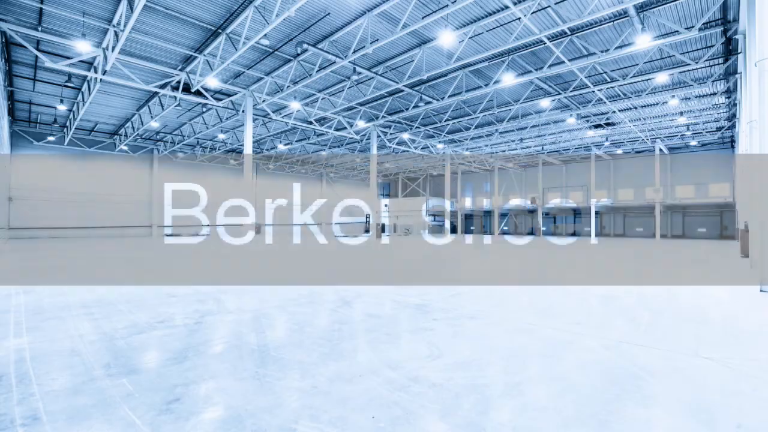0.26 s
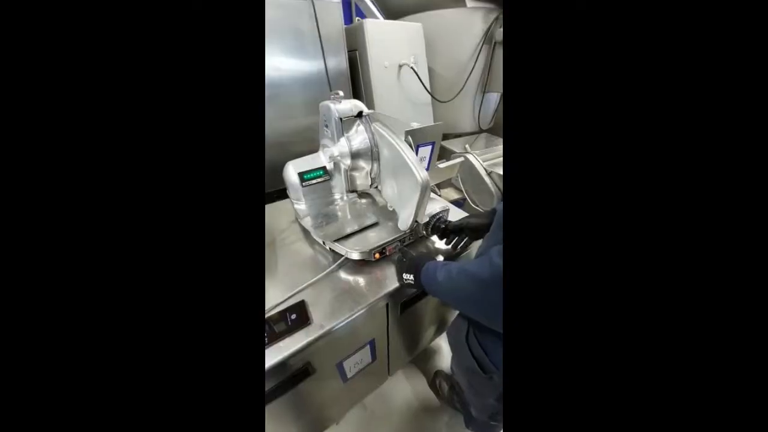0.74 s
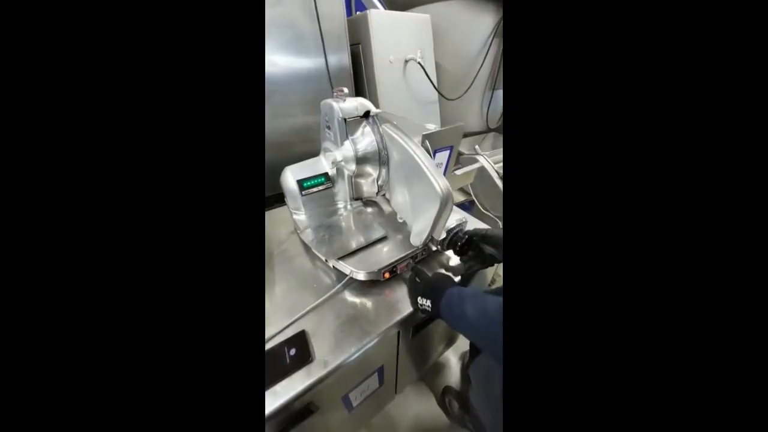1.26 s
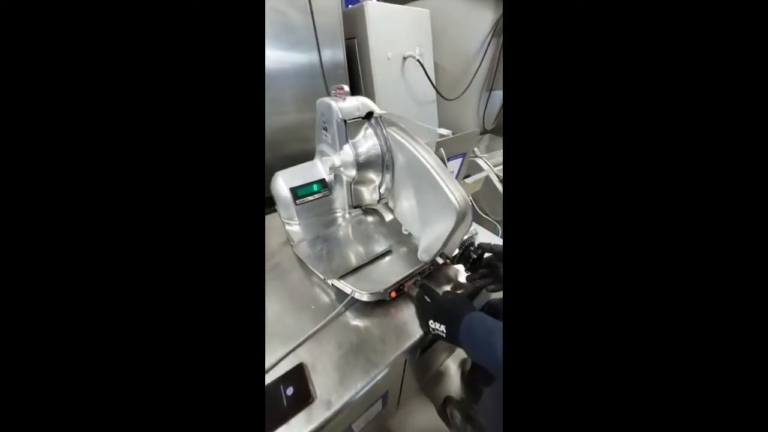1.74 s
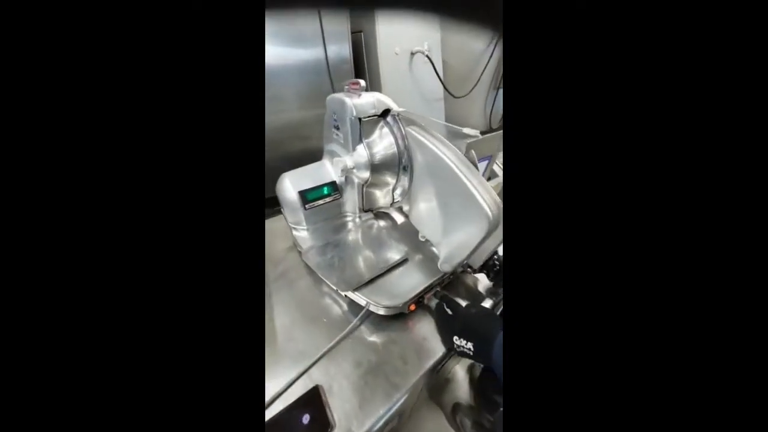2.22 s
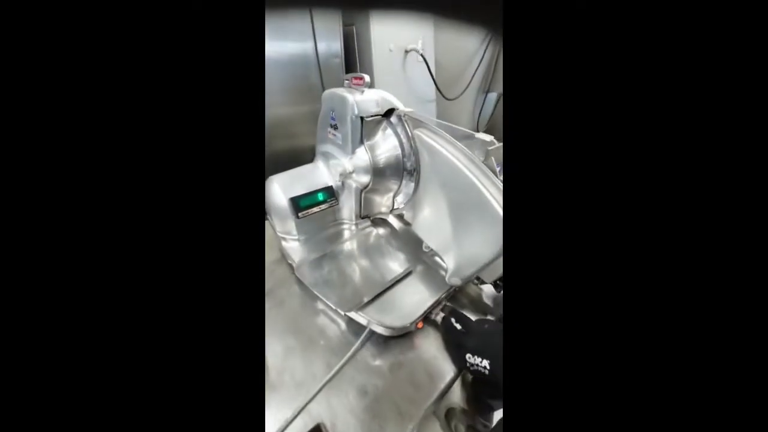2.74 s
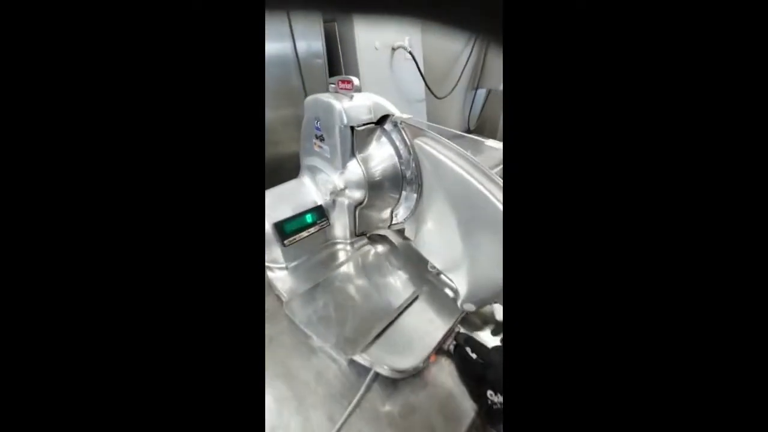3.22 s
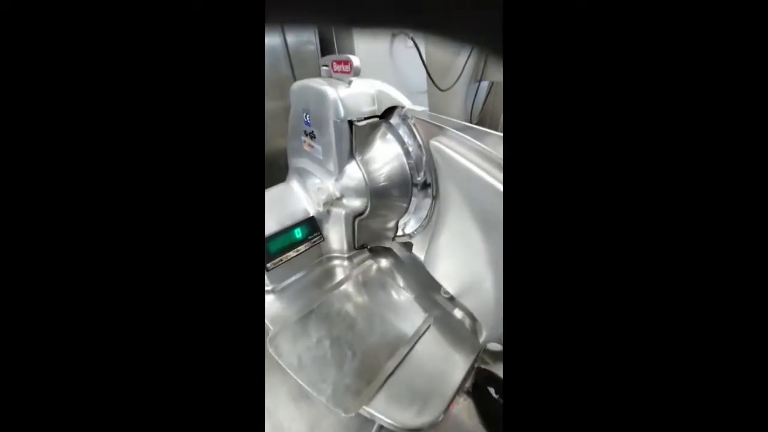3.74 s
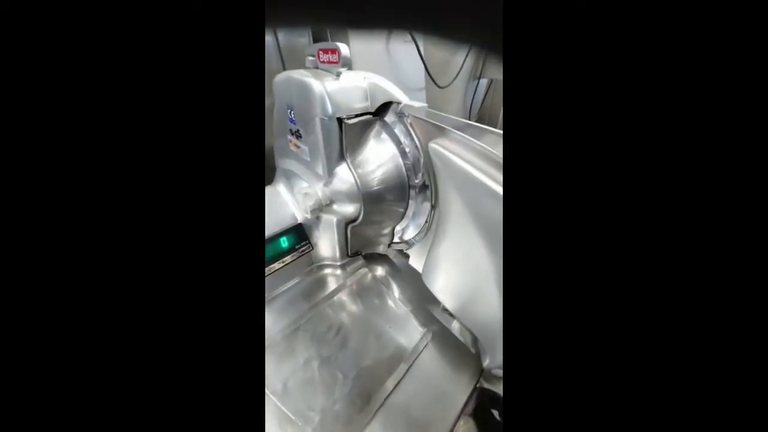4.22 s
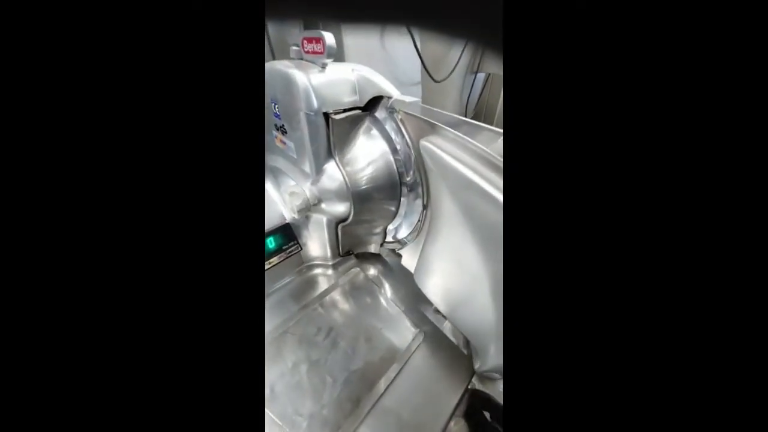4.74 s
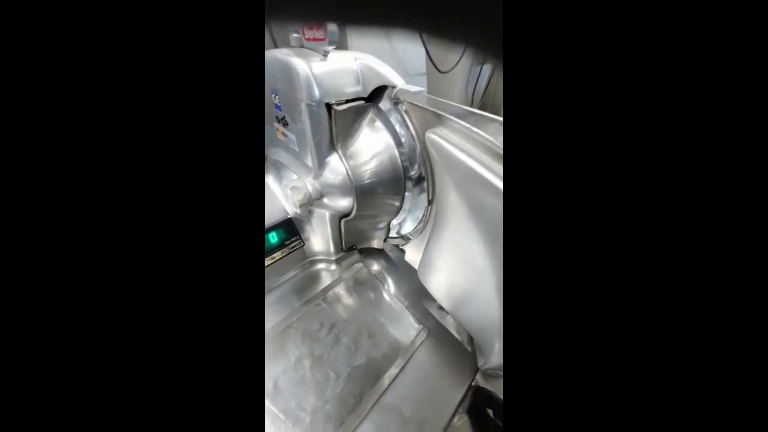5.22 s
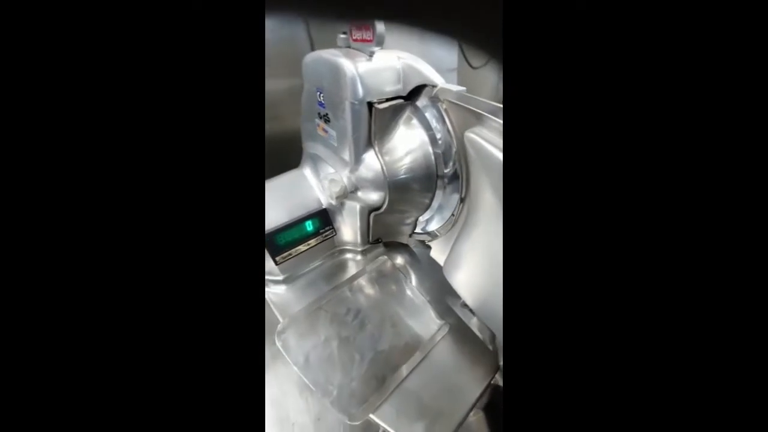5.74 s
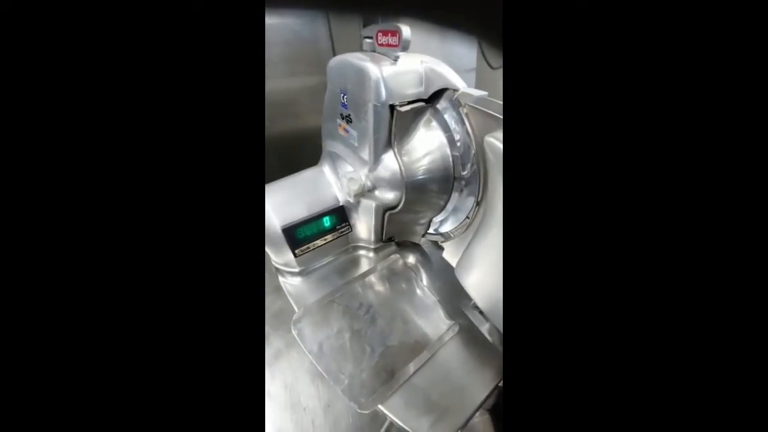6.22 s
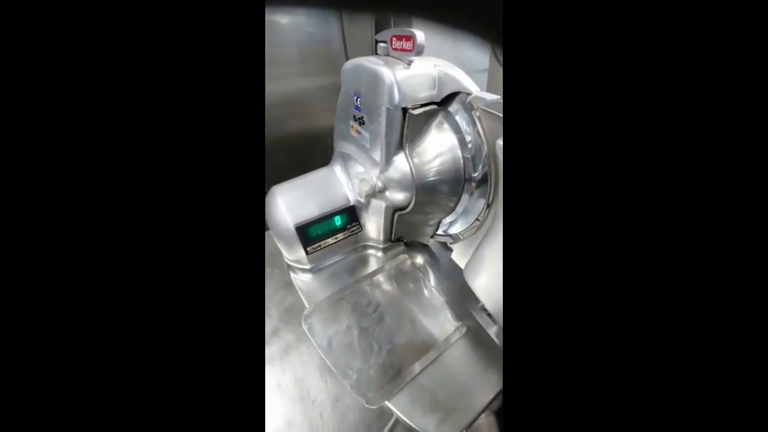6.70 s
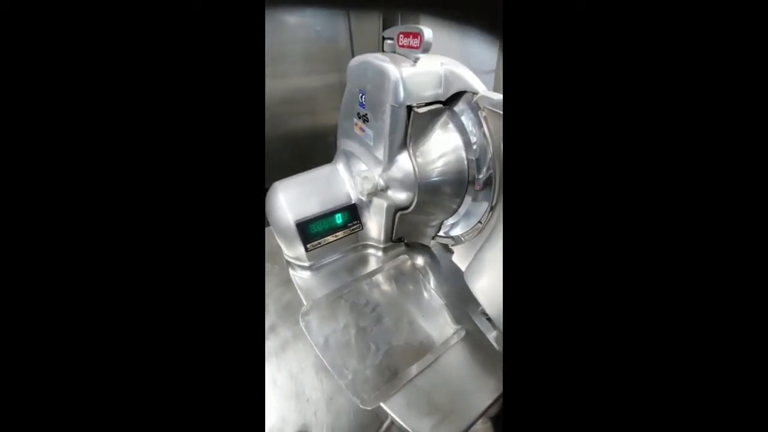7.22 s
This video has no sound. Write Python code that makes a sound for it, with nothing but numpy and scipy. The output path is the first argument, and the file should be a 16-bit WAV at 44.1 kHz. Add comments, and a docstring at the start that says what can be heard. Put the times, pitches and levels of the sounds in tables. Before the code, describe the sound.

An electric meat slicer clicks on and its blade grinds against a sharpening stone with a ringing, fast-pulsing metallic scrape.

```python
"""An electric meat slicer being sharpened, close to a stereo pair of microphones in a steel kitchen.
Over the refrigerators' hum the switch clicks, the motor groans up and the round blade meets the stone.
Grit makes blade and housing ring; once a turn the edge catches twice and its high spots brush the stone.
The drive rumbles underneath, and the sharpening attachment knocks now and then."""
import sys
import numpy as np
from scipy import signal
from scipy.fft import rfft, irfft
from scipy.io import wavfile

SR = 44100
rng = np.random.default_rng(int(sys.argv[2]) if len(sys.argv) > 2 else 0)


def waveform_to_disk(signal):
    """Save audio, clipped to [-1, 1], as 16-bit WAV at the path in sys.argv[1]."""
    frames = np.transpose(np.atleast_2d(signal))
    scaled = np.clip(frames, -1, 1) * 32767
    samples = np.round(scaled).astype(np.int16)
    wavfile.write(sys.argv[1], SR, samples)


N = 329427
T = np.arange(N) / SR
HZ = np.fft.rfftfreq(N, 1 / SR) + 1e-3
START_S, MOTOR_ON_S, CONTACT_S = 0.605, 1.08, 1.304  # sound begins, motor starts, stone meets edge
MAIN_CATCH_S, TURN_S = 1.343, 0.3053  # the nick in the edge first meets the stone; one turn of the blade


def undb(db):
    """Decibels to gain."""
    return 10 ** (np.asarray(db) / 20)


def unit(x):
    """Scale to an rms of one."""
    return x / np.sqrt(np.mean(x ** 2))


def spectrum(points):
    """Spread (f/Hz, level/dB) points over all frequencies, on a logarithmic axis."""
    hz, db = np.transpose(points)
    return np.interp(np.log(HZ), np.log(hz), db)


def curves(table):
    """The columns of a (t/s, ...) table at every sample."""
    times, *columns = np.transpose(table)
    return [np.interp(T, times, column) for column in columns]


def wander(rate_hz):
    """Smooth random drift with a spread near one."""
    points = rng.standard_normal(N // 20)
    return 1.2 * np.interp(T * rate_hz, np.arange(len(points)), points)


def shape(x, gain):
    """Filter by a gain for every frequency."""
    return irfft(rfft(x) * gain, N)


def below(x, hz, order):
    """The part of a sound under a frequency."""
    return shape(x, 1 / (1 + (HZ / hz) ** order))


def noise(colour, apart_hz):
    """Coloured noise at the two microphones: alike in the bass, unrelated above apart_hz."""
    mid, side = rng.standard_normal((2, N))
    side = shape(side, np.minimum(HZ / apart_hz, 1) ** 0.84)
    return unit(shape(np.array([mid + side, mid - side]), undb(spectrum(colour))))


def tones(lines, waver_db):
    """Steady sines that waver a little in level."""
    return sum(np.sqrt(2) * undb(db + waver_db * wander(4.02))
               * np.sin(2 * np.pi * hz * T + rng.uniform(0, 2 * np.pi)) for hz, db in lines)


def burst(start_s, rise_s, decay_s):
    """Envelope with a linear rise and an exponential fall; an infinite decay holds."""
    age = T - start_s
    return np.clip(age / rise_s, 0, 1) * np.exp(-np.clip((age - rise_s) / decay_s, 0, 20))


def each_turn(lag_s, rise_s, decay_s):
    """Envelope of a contact that comes back on every turn, lag_s after the main catch."""
    since = T - MAIN_CATCH_S - lag_s
    age = since % TURN_S
    return (since > 0) * np.minimum(age / rise_s, 1) * np.exp(-np.maximum(age - rise_s, 0) / decay_s)


def ring(force, modes, apart_hz):
    """Drive damped modes; the higher ones reach the two microphones out of step."""
    t = T[:SR // 4]
    response = np.zeros((2, len(t)))
    for k, (hz, width, db) in enumerate(modes):
        skew = (-1) ** k * min(hz / apart_hz, 1) * np.pi / 4 * np.array([[1], [-1]])
        response += undb(db) * width * np.exp(-np.pi * width * t) * np.cos(2 * np.pi * hz * t + skew)
    response /= np.sqrt(np.sum(response ** 2) / 2)
    return signal.fftconvolve(force[None], response, axes=1)[:, :N]


# room tone of the refrigerators: (f/Hz, relative level/dB)
FRIDGE_COLOUR = [(15, -44), (25, -25), (59, -6), (75, -2.5), (109, -10), (176, -22), (213, -10.5),
                 (335, -10), (475, -28), (769, -22.5), (879, -20), (1090, -31), (1540, -29), (1900, -36),
                 (2500, -50), (3300, -55), (4500, -48.5), (6000, -54), (15000, -57)]
# their hum: (f/Hz, level/dB)
FRIDGE_HUM = [(54, -52), (226, -54.5), (296, -61.5), (866.7, -64.5)]


def fridges(level_db=-45):
    """Compressors and fans hum and rush in the kitchen behind the slicer."""
    return undb(level_db) * noise(FRIDGE_COLOUR, apart_hz=1430) + tones(FRIDGE_HUM, waver_db=-2.0)


# resonances of the starting motor: (f/Hz, width/Hz, relative level/dB)
GROAN_MODES = [(292, 28, 3.5), (371, 51, -5.5)]
# rumble of the drive: (t/s, level/dB)
RUMBLE_LEVEL = [(1.3, -43.5), (3, -42), (4.3, -37.5), (5.2, -40.5), (7.47, -40.5)]
# its colour through the counter: (f/Hz, relative level/dB)
RUMBLE_COLOUR = [(30, -20), (48, -21), (85, 9), (118, -7), (140, 0), (168, -12), (195, -0.5), (222, 7.5),
                 (265, -3.5), (340, -11.5), (480, -11.5), (900, -39.5)]
# mains and motor tones: (f/Hz, relative level/dB)
MOTOR_HUM = [(49.9, -77), (99.9, -43), (221, -51.5), (296, -63)]


def motor(groan_db=-43, hum_db=-1.5, swell_db=2, swell_lag_s=0.072):
    """The motor groans as it takes up the load, then hums and rumbles through the steel counter."""
    strain = undb(groan_db) * burst(MOTOR_ON_S, 0.02, 1.4) * rng.standard_normal(N)
    groan = below(ring(strain, GROAN_MODES, apart_hz=1400), hz=500, order=6)
    swell = np.cos(2 * np.pi * (T - MAIN_CATCH_S - swell_lag_s) / TURN_S)  # peaks just after each catch
    rumble = undb(curves(RUMBLE_LEVEL)[0] + swell_db * swell) * noise(RUMBLE_COLOUR, apart_hz=1400)
    hum = undb(hum_db) * tones(MOTOR_HUM, waver_db=1.5)
    return groan + burst(MOTOR_ON_S, 0.39, np.inf) * (rumble + hum)


# click of the start switch: (f/Hz, relative level/dB)
CLICK_COLOUR = [(300, -4), (700, 10.5), (2500, -7), (5000, 0), (8000, -9), (11500, -0.5), (16000, -18)]


def switch(at_s=1.084, level_db=-32.5):
    """The start switch snaps over: a sharp click with a faint tail."""
    snap = burst(at_s, 0.00061, 0.0045) + undb(-20) * burst(at_s, 0.002, 0.015)
    return undb(level_db) * snap * noise(CLICK_COLOUR, apart_hz=1500)


def grit(rough_db, grain_hz):
    """Uneven force of abrasive grains passing under the edge."""
    return unit(undb(rough_db * wander(grain_hz)))


# ringing of the steel disc: (f/Hz, width/Hz, relative level/dB)
BLADE_MODES = [(1133.4, 22.6, -11), (1667, 4.4, -2.5), (1701, 8, -6.5), (2340, 9.2, 0.5), (3060, 20.3, -2),
               (3700, 10, -3), (3761, 9, 3), (6540, 18, 0), (10020, 36, -3.5), (10100, 22, -5),
               (10600, 23, -12), (10800, 20, 4), (10980, 24, 0), (11450, 24, 1), (11390, 34, -0.5),
               (11630, 30, -5), (11760, 33, -6), (12040, 34, -3.5), (12340, 31, 3.5), (12680, 26, 4),
               (12880, 45, 2.5), (13100, 23.6, -15), (13361, 40, -5), (13663, 30, -7), (13800, 52, -1),
               (14217, 33, -16), (14500, 46, 0), (14793, 34, -6), (15100, 43, -4.5), (15568, 54, -6)]
# resonances of guard, stone holder and tray: (f/Hz, width/Hz, relative level/dB)
HOUSING_MODES = [(668, 39, -3.5), (789, 30, -4), (1289, 41, 2.5), (1452, 25, -11), (1925, 38, -4.5),
                 (2289, 10.3, 5.5), (2539, 55, -3.5), (2830, 106, -5), (3110, 56, -10.5), (3360, 56, -34),
                 (4200, 90, -3.5), (4494, 49, 0.5), (5070, 22, 0.5), (5315, 21, -2.5), (5750, 66, -5),
                 (6290, 28, -2), (6820, 21, -1.5), (7280, 30, -7), (7330, 37, -2), (7660, 22, -6),
                 (7980, 43, -4), (8300, 50, -18.5), (9140, 90, -21)]
# hiss straight from stone to microphones: (f/Hz, relative level/dB)
GRIT_COLOUR = [(400, -7), (700, 6.5), (1000, -8), (2000, -5), (4500, -1.5), (6100, -0.5), (7200, 3.5),
               (8700, 4), (11500, -2.5), (14000, 2.5), (16000, -1.5)]
# steady rub of the stone: (t/s, hiss/dB, blade singing/dB, housing rasp/dB)
RUB_LEVELS = [(1.33, -30.5, -45, -40), (1.55, -30.5, -41, -41), (2.1, -34, -35, -39.5),
              (3.4, -33.5, -38.5, -39), (4.75, -34.5, -35, -39), (5.12, -27, -32.5, -38),
              (5.4, -29, -40, -42), (5.9, -30, -38, -39.5), (6.4, -34.5, -41.5, -41.5),
              (7.47, -35, -40.5, -41)]
# how hard the uneven edge meets the stone: (t/s, first catch/dB, main catch/dB, high spots/dB)
EDGE_LEVELS = [(1.35, -32, -26.5, -27.5), (1.9, -28.5, -20.5, -25), (2.3, -22.5, -23, -26.5),
               (2.9, -24.5, -26.5, -27.5), (3.4, -25, -27, -27.5), (4.9, -29.5, -23, -28),
               (5.35, -38, -26, -31), (5.9, -43, -24.5, -35.5), (6.6, -35.5, -26.5, -41),
               (7.47, -30.5, -27.5, -39)]
# high spots met on every turn: (lag after main catch/s, rise/s, decay/s, hiss/dB, singing/dB, rasp/dB)
EDGE_SPOTS = [(.03, 0.018, 0.023, -5, -8, -6.5), (0.1588, .015, 0.0077, 0, 1, -11.5),
              (0.16, 0.026, 0.11, -9, -0.5, -11.5)]
# the stone bites harder: (t/s, level/dB, decay/s)
STONE_BITES = [(4.872, -34, 0.011), (5.002, -27.5, 0.053), (5.045, -28, .015), (5.09, -17.5, 0.0089),
               (5.187, -23, .012), (5.316, -29, 0.0073), (5.645, -30, .035), (5.703, -24.5, 0.0065),
               (5.95, -30, .035)]


def grinding(split_hz=5200, scour_db=-30.5, bedding_db=-40, bedding_hz=1690):
    """The stone rubs the edge and rings blade and housing; high spots and bites press it harder."""
    touch = burst(CONTACT_S, 0.0098, np.inf)
    hiss, sing, rasp = (touch * undb(db) for db in curves(RUB_LEVELS))
    spots = sum(np.outer(undb(dbs), each_turn(lag, rise, decay)) for lag, rise, decay, *dbs in EDGE_SPOTS)
    spot_hiss, spot_sing, spot_rasp = undb(curves(EDGE_LEVELS)[2]) * spots
    bites = sum(undb(db) * burst(s, 0.0033, decay) for s, db, decay in STONE_BITES)
    bites += undb(scour_db) * each_turn(0, 0.0077, 0.01)  # each main catch also scours the stone
    grains = grit(rough_db=1.18, grain_hz=696.5)
    fine = grains * np.hypot(hiss, spot_hiss + bites)
    coarse = grains * np.hypot(rasp, spot_rasp + undb(-10) * bites) * grit(rough_db=2.5, grain_hz=262.4)
    flex = grains * np.hypot(sing, undb(-4) * spot_sing)
    force = rng.standard_normal((4, N))
    # fine grains excite the rim's high modes, the stone's pressure bends the whole disc
    rim = ring(fine * force[0], [m for m in BLADE_MODES if m[0] > split_hz], apart_hz=3000)
    disc = ring(flex * force[1], [m for m in BLADE_MODES if m[0] <= split_hz], apart_hz=3400)
    housing = ring(coarse * force[2], HOUSING_MODES, apart_hz=1160)
    # one pair of modes sings out until the stone has bedded in
    pair = [m for m in BLADE_MODES if abs(m[0] - bedding_hz) < bedding_hz / 10]
    fresh = grains * undb(bedding_db) * burst(CONTACT_S, 0.05, 0.69)
    bedding = ring(fresh * force[3], pair, apart_hz=3200)
    scrape = noise(GRIT_COLOUR, apart_hz=1290)
    low = below(scrape, split_hz, order=4)
    direct = undb(-3) * fine * unit(scrape - low) + undb(-2) * coarse * unit(low)
    return direct + undb(-1) * (rim + disc) + bedding + undb(1.42) * housing


# crack of the edge snagging: (f/Hz, relative level/dB)
CATCH_COLOUR = [(250, 4), (450, 0), (680, 0.5), (950, -4), (1300, 6.5), (2300, 4.5), (4300, 5.5),
                (6000, -2.5), (10000, -0.5), (16000, -12)]
# thud of the stone holder, harder late on: (t/s, level/dB)
THUD_LEVEL = [(1.35, -37), (5.4, -38), (6.3, -32.5), (7.47, -28.5)]


def catches(lead_s=0.018, thud_hz=663, thud_width_hz=59):
    """Once a turn the edge snags twice in quick succession and shakes the stone holder."""
    first_db, main_db, _ = curves(EDGE_LEVELS)
    first, main = each_turn(-lead_s, 0.007, 0.012), each_turn(0, 0.0058, 0.012)
    push = (undb(first_db) * first + undb(main_db) * main) * grit(rough_db=-1.0, grain_hz=572)
    force = push * rng.standard_normal(N)
    shove = undb(curves(THUD_LEVEL)[0]) * (undb(-4) * first + main) * rng.standard_normal(N)
    crack = push * noise(CATCH_COLOUR, apart_hz=1500)
    housing = ring(force, HOUSING_MODES, apart_hz=1190)
    blade = ring(force, BLADE_MODES, apart_hz=3000)
    thud = ring(shove, [(thud_hz, thud_width_hz, 0)], apart_hz=1470)
    return undb(2) * crack + undb(-1) * housing + undb(-9) * blade + thud


# knocks of the attachment: (t/s, level/dB, f/Hz, decay/s)
ATTACHMENT_KNOCKS = [(1.355, -34.5, 392, 0.03), (4.142, -26, 460, 0.016), (4.147, -29, 740, .014),
                     (5.007, -24, 670, 0.016), (5.047, -22.5, 650, 0.018), (6.745, -35, 245, 0.029)]


def knocks(width_share=0.27, dull_hz=1600, rattle_db=-5):
    """The attachment strikes the machine with dull blows that rattle the housing."""
    thumps, blows = 0, 0
    for s, db, hz, decay in ATTACHMENT_KNOCKS:
        force = undb(db) * burst(s, 0.0076, decay) * rng.standard_normal(N)
        thumps += ring(force, [(hz, width_share * hz, 0)], apart_hz=1000)
        blows += force * (hz / 650) ** 2  # sharper blows rattle more
    rattle = ring(blows, HOUSING_MODES, apart_hz=1200)
    return below(thumps, dull_hz, order=6) + undb(rattle_db) * rattle


# bands where blade and guard radiate poorly: (f/Hz, width/Hz, level/dB)
RADIATION_DIPS = [(1397, 90, -3), (2106, 95, -1), (3410, 83, -3.5), (4060, 110, -4.5), (5000, 92, -3),
                  (5540, 79, -2.5), (6110, 98, -4), (6430, 43, -9), (6700, 60, -4), (7450, 70, -5),
                  (7810, 76, -4), (8620, 100, -6)]


def radiate(x, lift_db=0.52):
    """The steel lets the scraping out unevenly: narrow valleys lie between its resonances."""
    dips_db = sum(db * np.exp(-((HZ - hz) / width) ** 2) for hz, width, db in RADIATION_DIPS)
    return shape(x, undb(lift_db + dips_db))


def kitchen(x, t60_s=0.25, wet_db=-11):
    """Short reflections from steel walls, well under the direct sound this close to the machine."""
    t = T[:SR // 2]
    tail = rng.standard_normal((2, len(t))) * np.exp(-np.log(1000) * t / t60_s)
    tail *= np.clip(t / 0.0073, 0, 1)
    tail /= np.sqrt(np.sum(tail ** 2) / 2)
    return x + undb(wet_db) * signal.fftconvolve(x, tail, axes=1)[:, :N]


# left microphone minus right: (f/Hz, level/dB)
MIC_BALANCE = [(60, -0.5), (130, -3.5), (260, -3.5), (600, 3), (1100, 0), (2300, -1), (4000, -3),
               (6300, 3.5), (9000, 2), (12000, -6), (16000, -2.5)]


def scene():
    """The slicer in its kitchen as the microphones hear it, each register leaning to its own side."""
    slicer = radiate(grinding() + catches()) + knocks() + switch()
    sound = kitchen(slicer) + motor() + fridges()
    lean = undb(spectrum(MIC_BALANCE) * np.array([[0.5], [-0.5]]))
    return shape(sound, lean) * burst(START_S, 0.0023, np.inf)


def record(dry, top_hz=15750):
    """The phone that holds the microphones cuts the top treble steeply."""
    return signal.sosfilt(signal.ellip(10, 0.2, 80, top_hz, fs=SR, output="sos"), dry)


dry = scene()
out = record(dry)
waveform_to_disk(out)
```